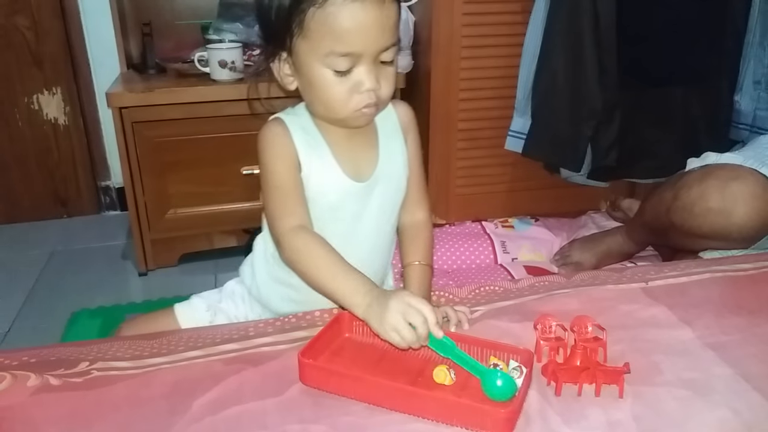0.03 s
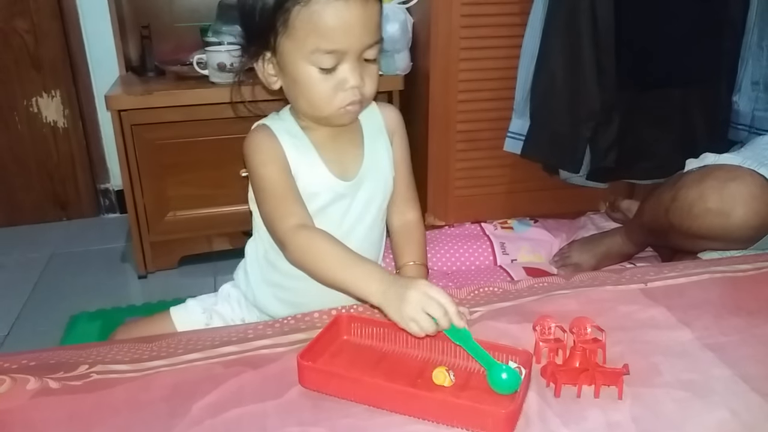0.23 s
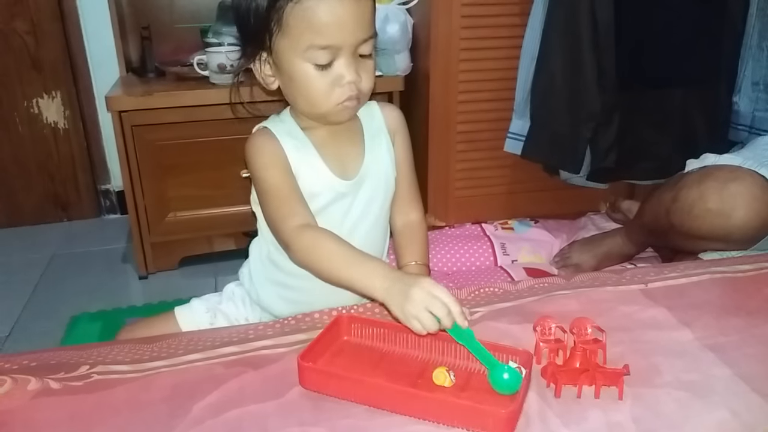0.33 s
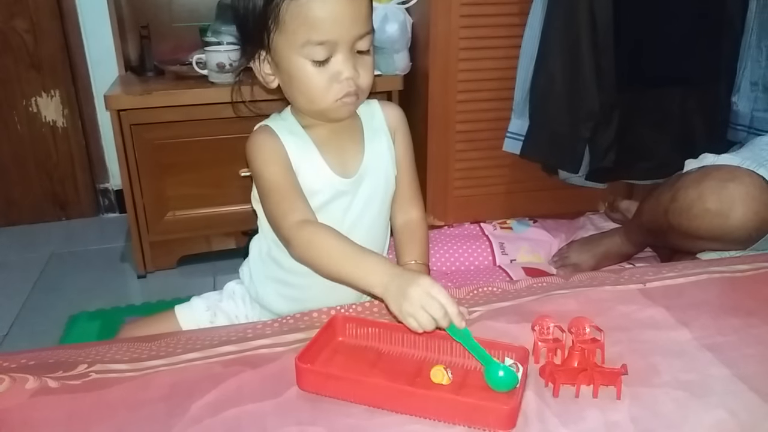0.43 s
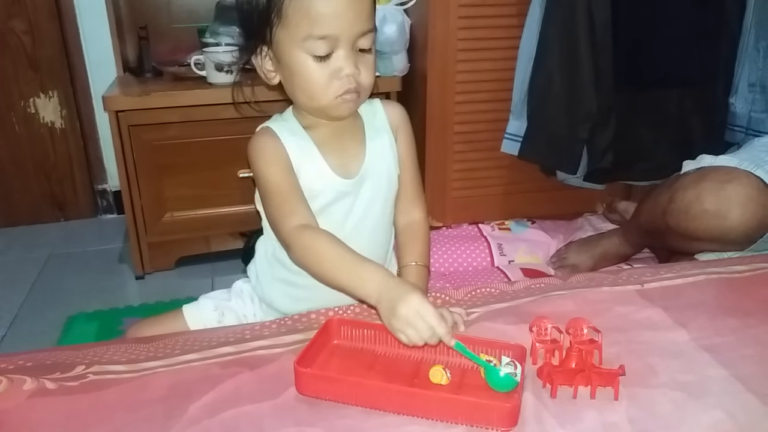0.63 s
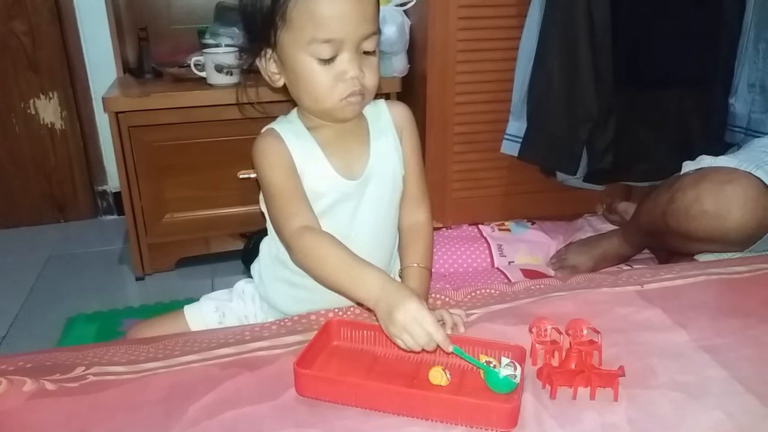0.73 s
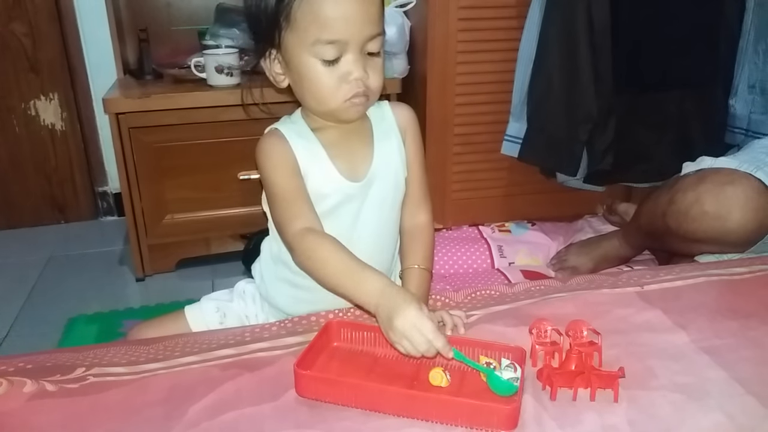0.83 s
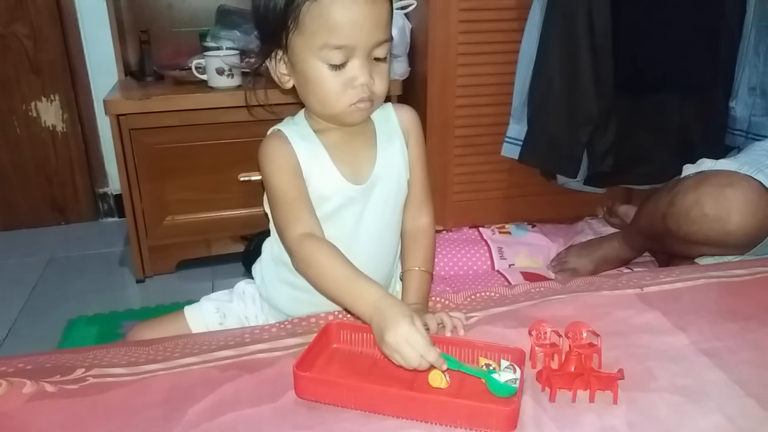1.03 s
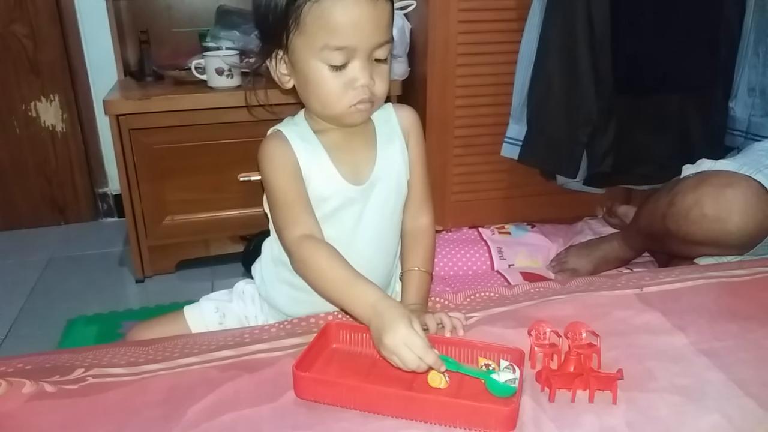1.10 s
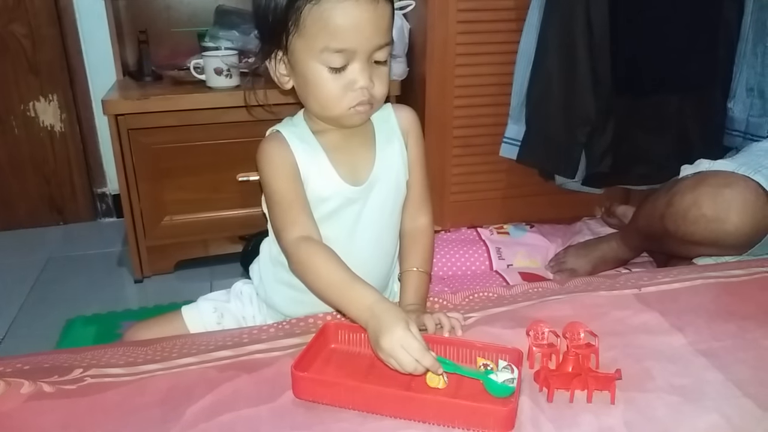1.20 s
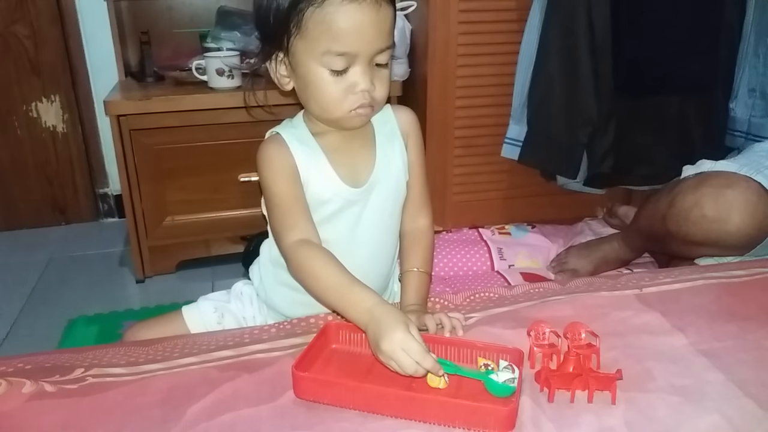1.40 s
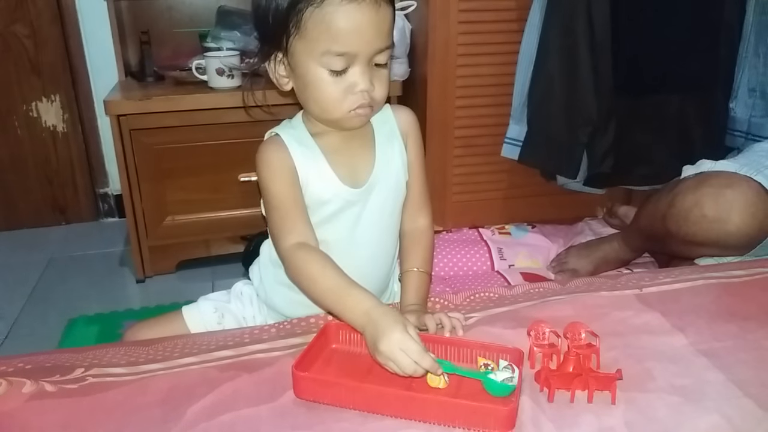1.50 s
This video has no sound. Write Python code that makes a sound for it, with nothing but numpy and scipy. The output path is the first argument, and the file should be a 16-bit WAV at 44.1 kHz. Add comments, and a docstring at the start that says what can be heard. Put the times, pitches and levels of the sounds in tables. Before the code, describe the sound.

Close to the microphone, a plastic spoon clicks and scrapes against shells in a tray. One bright clack stands out, followed by a few softer taps and faint rubbing, over the quiet hum of a small room.

```python
"""A small room with a low hum, one microphone close to a plastic tray on a mattress.
A plastic spoon touches the tray, scrapes among shells and knocks one with a sharp clack, then taps
and rubs lightly. A brief ring is heard with each contact; the scraping is a dense run of tiny slips.
Surfaces close by mirror the sound before it dies away in the room. Far behind it are soft room
noise and a faint tone that swells once."""
import sys
import numpy as np
from scipy import signal
from scipy.fft import rfft, irfft
from scipy.io import wavfile
from scipy.ndimage import uniform_filter1d

SR = 44100
rng = np.random.default_rng(int(sys.argv[2]) if len(sys.argv) > 2 else 0)


def pcm_store(signal):
    """Save signal as 16-bit PCM."""
    levels = np.round(np.clip(np.atleast_2d(signal), -1, 1) * 32767)
    wavfile.write(sys.argv[1], SR, levels.astype(np.int16).T)


N = 68355

# the spoon's taps and clacks on tray and shells:
# start_s, level_db, bass_db, treble_db, treble_from_hz, pitch_ratio, ring_ratio
SPOON_KNOCKS = [(0.1088, -19.5, 0.5, 8.5, 3680, .995, 0.68), (0.1686, -23.5, -6, -2.5, 4500, 1.025, 0.92),
                (0.2134, -24, 1, 1.5, 4200, 1.01, 1), (0.2259, -19.5, -4, 4, 3630, 1.13, .85),
                (0.2463, 1, -5.5, -5.5, 4500, .997, 1), (0.2690, -29.5, -32, 11, 6420, 1.03, 0.9),
                (0.3408, -29.5, -6, 21, 6130, 0.92, 0.93), (0.5024, -35.5, -3, 14, 6000, 1.055, 0.77),
                (0.6162, -47.5, 0, 19.5, 5750, 1.005, .7), (0.6569, -28, 4.5, -10, 4000, 1.016, 0.68)]
# the short, bright ring heard with each knock, before its own ratios apply: pitch_hz, level_db, t60_s
KNOCK_RING = [(1023, -35.5, 0.0045), (1340, -33, 0.0039), (2010, -14.5, .012), (2703, -20, 0.026),
              (3630, -16, .006), (3625, -4.5, 0.012), (4235, -17.5, 0.015), (5050, -19.5, 0.01),
              (6050, -23, .008), (6880, -26, 0.017), (7950, -24, 0.0052), (8610, -26, .008)]
# the tray's tick: pitch_hz, level_db, t60_s
TRAY_MODES = [(2620, 5, 0.019), (3420, -2, 0.0096), (6200, -1, .004), (8062, -9, 0.002284)]
# the tray's hollow thud on the mattress: pitch_hz, level_db, t60_s
THUD_MODES = [(232, -5.5, 0.043), (268.4, 15.5, 0.052), (660, -3.5, 0.019)]
# a small light object gives off little bass and little extreme treble: frequency_hz, gain_db
RADIATION = [(300, -29.5), (750, -19.5), (1050, -13), (2700, -2), (3000, -1.5), (3350, 0.5), (8800, 3.5),
             (9700, -11.5), (15500, -13)]
# the spoon dragging over shells: time_s, level_db
SCRAPE_LEVELS = [(0.104, -70.5), (0.115, -49), (0.15, -54), (0.19, -54), (0.222, -55.5), (0.241, -41),
                 (0.259, -76)]
# colour of that drag: frequency_hz, gain_db
SCRAPE_COLOUR = [(500, -13.5), (1500, -9), (2900, -9.5), (3650, 2), (4100, 2), (6000, -9.5), (8700, -9),
                 (10300, -22.5), (15500, -31)]
# the spoon rubbing lightly on the tray: time_s, level_db
RUB_LEVELS = [(0.56, -69.5), (0.61, -63), (0.64, -64), (0.70, -65), (0.73, -64.5), (0.82, -76.5),
              (0.93, -70), (1.05, -83)]
# colour of that rub: frequency_hz, gain_db
RUB_COLOUR = [(500, -14), (1030, -2.5), (1400, -11), (2900, -4), (3600, -1.5), (4600, -7.5), (6000, -17),
              (8700, -14), (10300, -31)]
# reflections off surfaces close by: delay_s, gain
NEAR_REFLECTIONS = [(.00138, 0.4), (.00244, 0.33)]
# first distinct echoes off furniture and walls, farther away: delay_s, gain_db
ROOM_ECHOES = [(.0178, -19), (.0275, -29.5)]
# what the walls send back: frequency_hz, gain_db
WALL_COLOUR = [(250, 2), (1000, 1.5), (2000, -6.5), (2850, 1.5), (3350, 5.5), (3650, -6), (4200, 3.5),
               (5200, 0), (5700, -1.5), (8500, -2), (12000, -1)]
# colour of the room noise: frequency_hz, gain_db
AIR_COLOUR = [(20, -44.5), (34, -31), (45, -6), (65, -9), (117, -5.5), (160, -6.5), (240, -6), (300, -10.5),
              (370, -14), (560, -16.5), (950, -22.5), (1350, -28), (1950, -26.5), (2500, -33), (3500, -23),
              (4500, -56), (6300, -58.5), (8700, -38), (10500, -36.5), (15500, -38.5)]
# lines of the hum, before its swell: pitch_hz, level_db
HUM_LINES = [(99, -72), (144, -64.5), (304, -77.5)]
# the hum swells and sinks: time_s, gain_db
HUM_SWELL = [(0, -5), (0.42, 3.5), (0.54, -8.5), (0.61, 7), (0.72, 3.5), (0.78, 0.5), (0.92, 7.5),
             (1.081, -3), (1.55, 1.5)]
# the faint background tone at its peak: pitch_hz, level_db
FAINT_PARTIALS = [(305, -63.5), (1030, -63.5)]

KNOCK_GAIN_DB, CRACK_GAIN_DB, CRACK_DECAY_S = -5.5, -23.5, 0.00035
BASS_CORNERS_HZ, TREBLE_SPAN_RATIO = (2100, 3200), 1.6  # where a knock's bass and treble shelves slope
TRAY_TOUCH_S, TICK_GAIN_DB, THUD_GAIN_DB, THUD_RISE_S = 0.0826, -36.5, -42.5, 0.007
ROOM_DB, ROOM_GAP_S, ROOM_BUILD_S = -4.5, 0.002, 0.0052
ROOM_SPLIT_HZ, ROOM_LOW_T60_S, ROOM_HIGH_T60_S = 5500, 0.34, 0.37
AIR_DB, AIR_WAVER_DB, HUM_WAVER_DB, HUM_DRIFT_RATIO = -59, 0.5, 2, 0.017
TONE_PEAK_S, TONE_SPREAD_S, TONE_DRIFT_RATIO = 0.64, 0.049, 0.0059
TOP_HZ = 15900


def spoon_knocks():
    """Close up, each knock is a tiny crack and a short ring with its own pitch, damping and colour."""
    size = 2048
    out = np.zeros(N)
    for start_s, level_db, bass_db, treble_db, treble_from_hz, pitch_ratio, ring_ratio in SPOON_KNOCKS:
        ringing = ring([(hz * pitch_ratio, db, t60 * ring_ratio) for hz, db, t60 in KNOCK_RING])[:size]
        crack = undb(CRACK_GAIN_DB) * rng.standard_normal(size) * np.exp(-clock()[:size] / CRACK_DECAY_S)
        corners_hz = [*BASS_CORNERS_HZ, treble_from_hz, treble_from_hz * TREBLE_SPAN_RATIO]
        colour = list(zip(corners_hz, (bass_db, 0, 0, treble_db)))
        knock = np.pad(tint(ringing + crack, colour), (0, N - size))
        out += undb(KNOCK_GAIN_DB + level_db) * delay(knock, start_s)
    return tint(out, RADIATION)


def tray_touch():
    """The spoon ticks on the tray, which answers with a soft thud on the mattress."""
    tick = undb(TICK_GAIN_DB) * tint(ring(TRAY_MODES), RADIATION)
    thud = undb(THUD_GAIN_DB) * ring(THUD_MODES) * (1 - np.exp(-clock() / THUD_RISE_S))
    return delay(tick + thud, TRAY_TOUCH_S)


def spoon_friction(levels, colour, slips_per_s=18000, scatter_db=1):
    """Dense, uneven little slips merge into a rustle that follows the pressure on the spoon."""
    slipping = rng.random(N) < slips_per_s / SR
    strength = undb(scatter_db * rng.standard_normal(N))
    slips = slipping * strength * rng.choice([-1, 1], N)
    return unit(tint(slips, colour)) * envelope(levels)


def room_tail(sound):
    """Wall reflections thicken over the first milliseconds, then lows and highs fade at their own rates."""
    t, tail = clock(), 0
    for side, t60 in (("low", ROOM_LOW_T60_S), ("high", ROOM_HIGH_T60_S)):
        band = signal.butter(2, ROOM_SPLIT_HZ, side, fs=SR, output="sos")
        tail += signal.sosfilt(band, rng.standard_normal(N)) * decay(t, t60)
    tail = delay(tail * (1 - np.exp(-t / ROOM_BUILD_S)), ROOM_GAP_S)
    response = tint(tail / np.linalg.norm(tail), WALL_COLOUR)
    return undb(ROOM_DB) * signal.fftconvolve(sound, response)[:N]


def room_tone():
    """All around the microphone: soft noise and low hum lines that waver in level and pitch."""
    air = unit(tint(rng.standard_normal(N), AIR_COLOUR))
    hum = sum(undb(db + HUM_WAVER_DB * wander(9)) * drifting_sine(hz, HUM_DRIFT_RATIO, rate_hz=22)
              for hz, db in HUM_LINES)
    return air * undb(AIR_DB + AIR_WAVER_DB * wander(5.6)) + hum * envelope(HUM_SWELL)


def faint_tone():
    """Far back, two soft, slightly unsteady partials fade in and out."""
    swell = np.exp(-((clock() - TONE_PEAK_S) / TONE_SPREAD_S) ** 2)
    tone = sum(undb(db) * drifting_sine(hz, TONE_DRIFT_RATIO, rate_hz=20) for hz, db in FAINT_PARTIALS)
    return swell * tone


def undb(db):
    """Decibels to gain."""
    return 10 ** (np.asarray(db) / 20)


def unit(x):
    """Scale to rms 1."""
    return x / np.sqrt(np.mean(x ** 2) + 1e-20)


def clock():
    """Time of each sample in seconds."""
    return np.arange(N) / SR


def delay(x, delay_s):
    """The sound, starting delay_s later."""
    return np.concatenate([np.zeros(round(delay_s * SR)), x])[:N]


def decay(t, t60_s):
    """Gain that falls 60 dB in t60_s."""
    return np.exp(-np.log(1000) * t / t60_s)


def envelope(points):
    """Gain that follows time_s, level_db points."""
    return undb(np.interp(clock(), *np.array(points).T))


def wander(rate_hz):
    """Slow random wander with rms 1."""
    hold = int(SR / rate_hz)
    steps = np.repeat(rng.standard_normal(N // hold + 1), hold)
    return unit(uniform_filter1d(uniform_filter1d(steps, hold), hold)[:N])


def drifting_sine(pitch_hz, drift_ratio, rate_hz):
    """A sine whose pitch wanders."""
    return np.sin(2 * np.pi * np.cumsum(pitch_hz * (1 + drift_ratio * wander(rate_hz))) / SR)


def ring(modes):
    """Damped modes struck once."""
    t = clock()[:N // 8]
    out = sum(undb(db) * np.sin(2 * np.pi * hz * t) * decay(t, t60) for hz, db, t60 in modes)
    return np.pad(out, (0, N - len(t)))


def tint(x, colour):
    """Causal filter through frequency_hz, gain_db points."""
    hz, db = np.array(colour).T
    n = len(x)
    bins_hz = np.maximum(np.arange(n + 1) * SR / (2 * n), 1)
    gain = undb(np.interp(np.log(bins_hz), np.log(hz), db))
    cepstrum = irfft(np.log(gain))
    cepstrum[1:n] *= 2  # fold to minimum phase: nothing rings ahead of a knock
    cepstrum[n + 1:] = 0
    return irfft(rfft(x, 2 * n) * np.exp(rfft(cepstrum)))[:n]


def scene():
    """At the microphone, near to far: the spoon, close reflections, echoes, room tail and background."""
    knocks = spoon_knocks() + tray_touch()
    near = knocks + sum(gain * delay(knocks, delay_s) for delay_s, gain in NEAR_REFLECTIONS)
    near += spoon_friction(SCRAPE_LEVELS, SCRAPE_COLOUR)
    near += spoon_friction(RUB_LEVELS, RUB_COLOUR)
    echoes = sum(undb(db) * delay(near, delay_s) for delay_s, db in ROOM_ECHOES)
    return (near + echoes + room_tail(near) + room_tone() + faint_tone())[None]


def record(dry):
    """The recorder cuts the top treble steeply."""
    return signal.sosfilt(signal.ellip(8, 0.2, 70, TOP_HZ, fs=SR, output="sos"), dry)


dry = scene()
out = record(dry)
pcm_store(out)
```